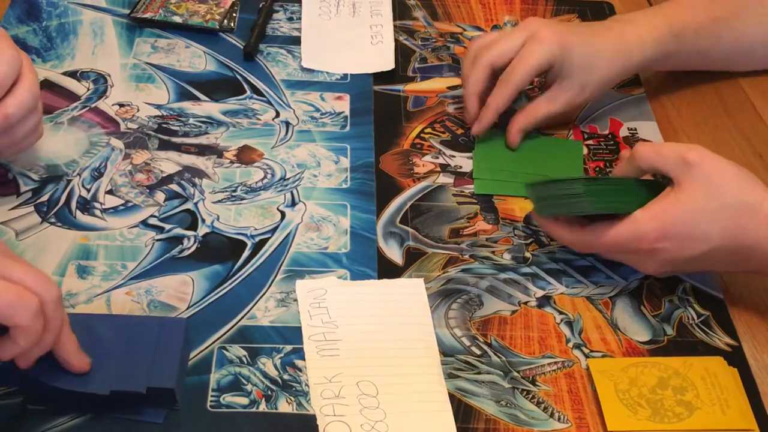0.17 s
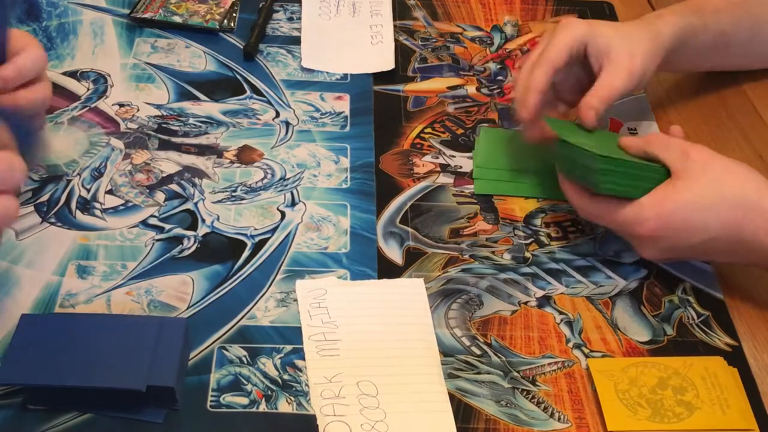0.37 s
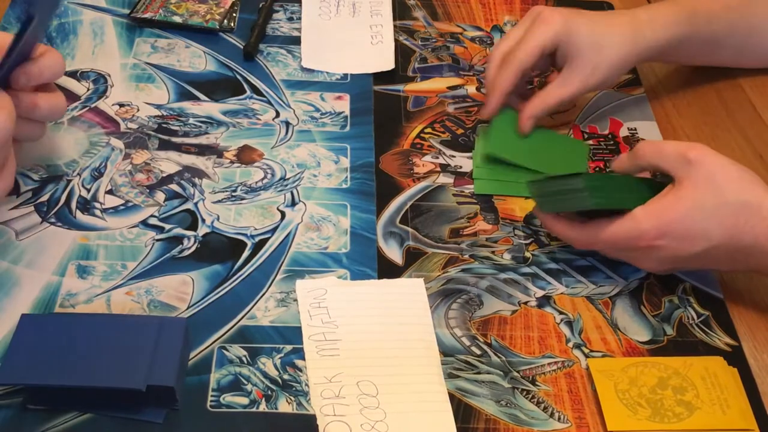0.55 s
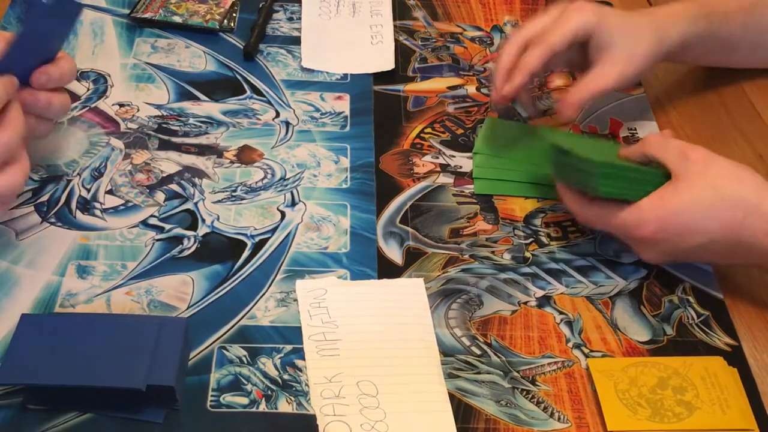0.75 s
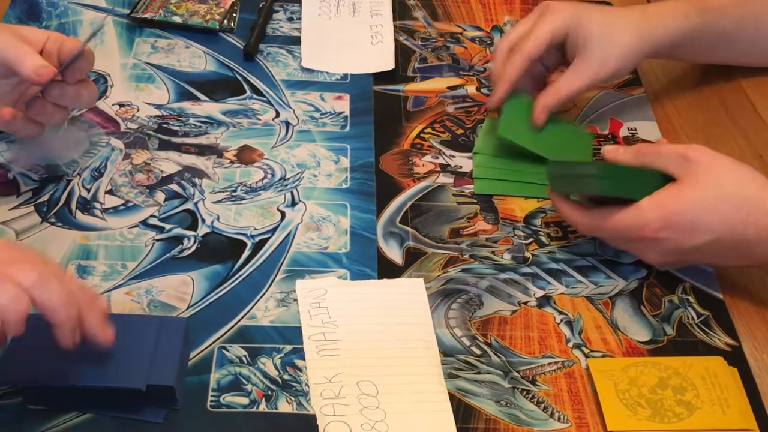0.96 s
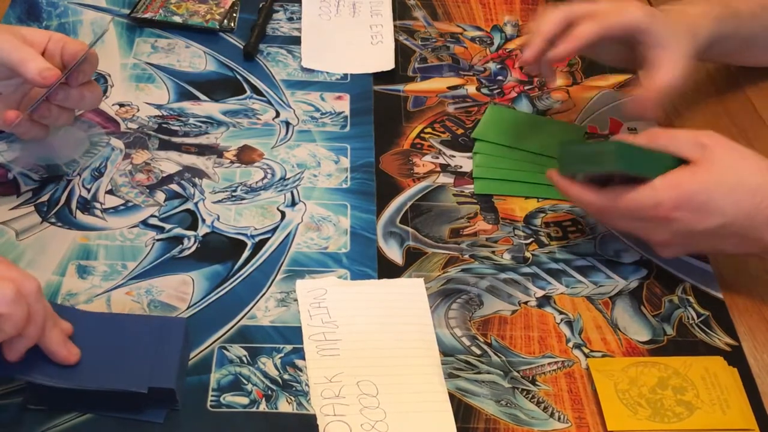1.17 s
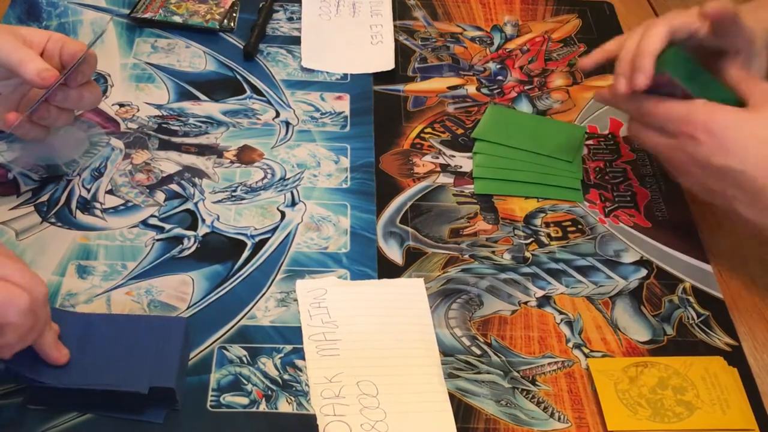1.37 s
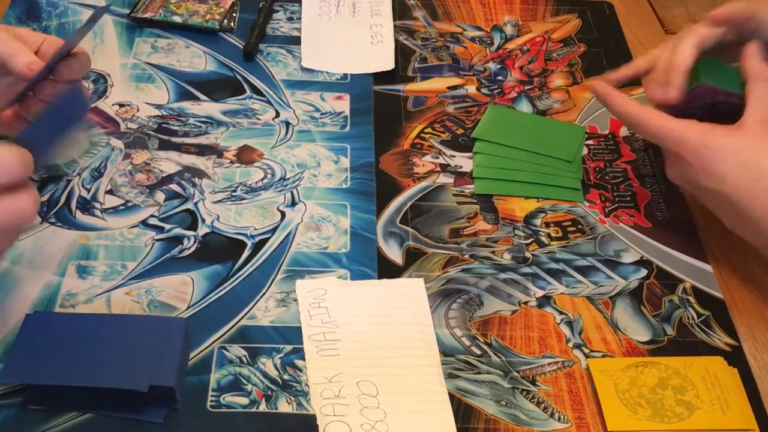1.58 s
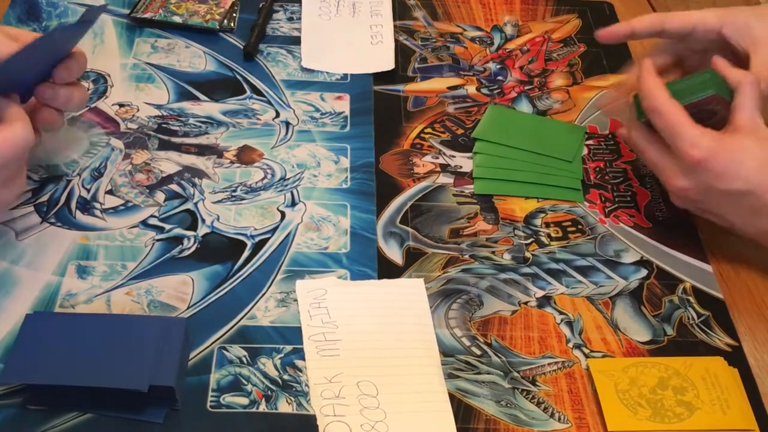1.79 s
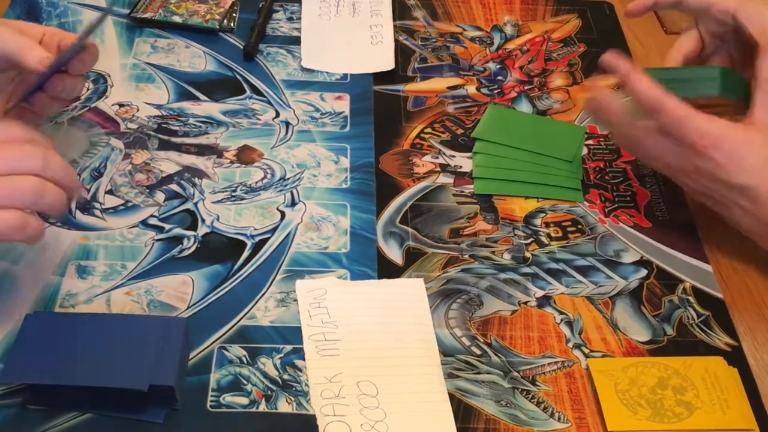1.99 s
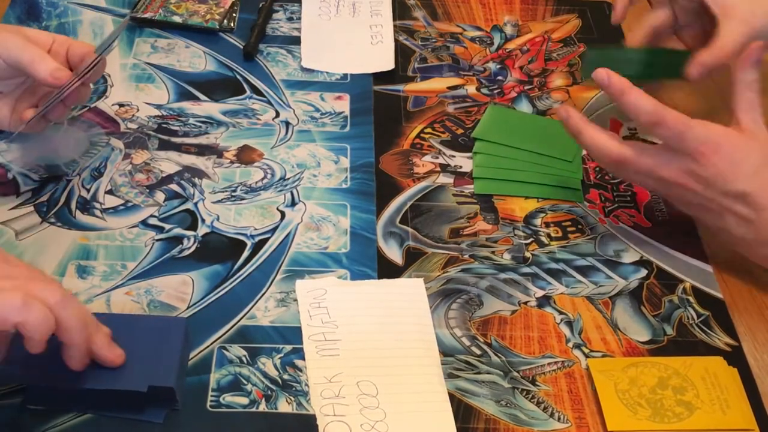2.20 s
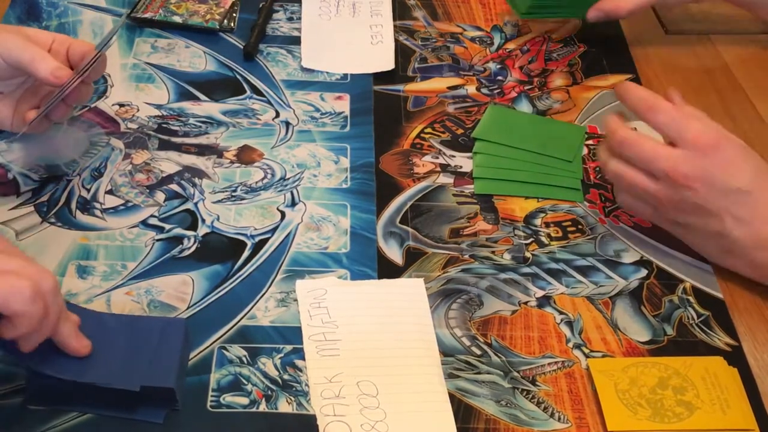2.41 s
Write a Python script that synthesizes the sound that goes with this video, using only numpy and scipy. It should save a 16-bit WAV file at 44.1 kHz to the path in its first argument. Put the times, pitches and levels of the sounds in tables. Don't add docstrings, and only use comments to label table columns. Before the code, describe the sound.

Close-up card handling in a hard-walled room: plastic sleeves hiss and flick free, cards tap the padded table with soft low thumps, busiest in the first second, then sparser and quieter over faint rumble and hum.

```python
import sys
import numpy as np
from scipy import signal
from scipy.fft import rfft, irfft, next_fast_len
from scipy.io import wavfile
from scipy.ndimage import map_coordinates

SR = 44100
rng = np.random.default_rng(int(sys.argv[2]) if len(sys.argv) > 2 else 0)


def waveform_to_disk(signal):
    frames = np.transpose(np.atleast_2d(signal))
    scaled = np.clip(frames, -1, 1) * 32767
    samples = np.round(scaled).astype(np.int16)
    wavfile.write(sys.argv[1], SR, samples)


def natural_amplitude(level_db):
    exponent = np.asarray(level_db, float) / 20
    return 10 ** exponent


N = 108045

# (frequency [Hz], density [dB per Hz])
SLEEVE = [(1500, -34), (3500, -5), (6000, -7), (9000, -3), (12500, 7.5), (16000, -4)]


def unit(x):
    return x / np.sqrt(np.mean(x ** 2) + 1e-20)


def along(points, hz):
    f, v = np.transpose(points)
    return np.interp(np.log(hz + 1), np.log(f + 1), v)


def filtered(x, response):
    m = next_fast_len(len(x) + 8192)
    hz = np.fft.rfftfreq(m, 1 / SR)
    return irfft(rfft(x, m) * response(hz), m)[:len(x)]


def noise(spectrum):
    closed = [(spectrum[0][0] / 2, -60)] + list(spectrum)
    return unit(filtered(rng.standard_normal(N), lambda hz: natural_amplitude(along(closed, hz))))


def wobble(rate):
    knots = rng.standard_normal(int(N * rate / SR) + 4)
    return map_coordinates(knots, [np.arange(N) * rate / SR])


def add(out, s, sound):
    part = out[max(round(s * SR), 0):][:len(sound)]
    part += sound[:len(part)]


def contacts(rows, colour_at):
    push_s, crack_s, crack_room_db = 0.0013, 0.0013, -1
    out, t = np.zeros(N), np.arange(SR // 50) / SR
    impulse = 1. * (t == t[64])
    for s, db, hz, crack_db, room_db in rows:
        push, crack = rng.standard_normal((2, len(t)))
        push[6] += 7
        card = colour_at(hz)
        sleeve = lambda f: natural_amplitude(along(SLEEVE, f) / 2)
        ring = filtered(push * np.exp(-t / push_s), card)
        crack = filtered(crack * t * np.exp(-t / crack_s * 2), sleeve)
        parts = ((db, ring, card, room_db),
                 (db + crack_db, crack, sleeve, room_db + crack_room_db))
        for peak_db, part, colour, share_db in parts:
            part = natural_amplitude(peak_db) * part / abs(part).max()
            click = filtered(impulse, colour)
            sent = natural_amplitude(share_db) * np.linalg.norm(part) / np.linalg.norm(click)
            add(out, s, part)
            add(out, s, sent * signal.fftconvolve(click, tail()))
    return out


def snaps():
    # (time [s], peak [dB], card ring [Hz], sleeve crack [dB re ring], room share [dB])
    flicks = [
        (.2411, -14.5, 2710, -12.5, 0),
        (.6572, -28.5, 2820, -4, 0.5),
        (1.049, -43, 2450, 0, -1.5),
        (1.412, -47.5, 5340, -12, -2),
        (1.4886, -55.5, 3100, 21, -0.5),
        (1.648, -53.5, 5770, 4, -9),
        (1.656, -45.5, 6140, 10, -4),
        (2.054, -60, 2050, 5, 0),
    ]
    q = 2.2

    def card_ring(hz):
        return lambda f: (1j * f * hz / q / (hz * hz - f * f + 1j * f * hz / q)) ** 2
    return contacts(flicks, card_ring)


def taps():
    # (time [s], peak [dB], dull above [Hz], sleeve crack [dB re tap], room share [dB])
    touches = [(.091, -50, 2500, 1.5, 7.5), (.1803, -33.5, 1310, -10.5, 5), (.195, -40, 1490, -2.5, -3.5),
               (.229, -31.5, 2000, -9, 8.5), (.2385, -45.5, 4000, 6.5, 4), (.498, -57, 2500, 2, 7.5),
               (.5977, -27.5, 1230, -13.5, 1), (.610, -45, 2500, -11, -4.5), (.905, -46.5, 1090, -8, -6),
               (.94, -45.5, 1980, -9.5, 6.5), (1.0382, -34.5, 3470, -3.5, 2), (1.0808, -25, 1500, -4, -1.5),
               (1.577, -48, 4000, 9.5, -6), (1.803, -43, 1200, -5.5, 0.5), (2.272, -51.5, 900, -8.5, 3.5),
               (2.387, -50.5, 2200, -17, 14)]
    low_hz = 250

    def soft_contact(hz):
        return lambda f: 1j * f / (low_hz + 1j * f) / (1 + 1j * f / hz) ** 1.02
    return contacts(touches, soft_contact)


def slides():
    # (end [s], length [s], sleeve hiss [dB], card rustle [dB])
    scrapes = [(.03, 0.15, -68.5, -63), (0.182, 0.18, -67, -60.5), (0.245, 0.033, -47.5, -55),
               (0.392, 0.046, -47, -53.5), (0.43, 0.018, -75, -58.5), (0.519, 0.046, -62.5, -59),
               (0.566, 0.05, -58, -55), (0.597, 0.032, -65, -53.5), (0.65, 0.062, -66.5, -53),
               (0.6562, 0.0048, -43.5, -35.5), (0.747, 0.029, -53.5, -57.5), (0.865, 0.065, -79, -61.5),
               (0.971, 0.049, -64, -54.5), (1.026, 0.018, -68, -56.5), (1.078, 0.0048, -39.5, -66),
               (1.346, 0.12, -67.5, -93), (1.415, 0.046, -65, -63), (1.503, .02, -58, -79),
               (1.563, 0.04, -53.5, -55.5), (1.573, 0.017, -42.5, -55), (1.58, 0.023, -50, -54.5),
               (1.66, 0.022, -65, -57), (1.692, 0.015, -66, -63), (1.941, 0.13, -70.5, -74.5),
               (2.065, 0.023, -74.5, -64), (2.285, 0.026, -89, -62), (2.45, 0.15, -70, -68.5)]
    # (frequency [Hz], density [dB per Hz])
    rustle = [(300, -19), (800, -21), (2000, -10.5), (3000, -10.5), (4500, -15), (7000, -21)]
    rise_power, stop_s, grain_db, grains_per_s = 1.67, 0.003, 2, 420
    t = np.arange(N) / SR
    power = np.zeros((2, N))
    for end, length, hiss_db, rustle_db in scrapes:
        swell = np.clip(1 - (end - t) / length, 0, 1)
        stop = np.exp(-np.clip(t - end, 0, None) / stop_s)
        shape = np.sin(swell * np.pi / 2) ** rise_power * stop
        power += natural_amplitude([[hiss_db], [rustle_db]]) ** 2 * shape ** 2
    grain = unit(natural_amplitude(grain_db * wobble(grains_per_s)))
    return grain * (np.sqrt(power[0]) * noise(SLEEVE) + np.sqrt(power[1]) * noise(rustle))


def thumps():
    # (time [s], peak [dB], table mode [Hz])
    pushes = [(.18, -52, 119), (.243, -43, 179.4), (0.602, -49.5, 185), (.72, -42, 136.4),
              (1.083, -40.5, 184), (1.09, -37.5, 106.8), (1.585, -45.5, 106), (1.586, -54.5, 279),
              (0.249, -54, 334.4), (2.392, -60.5, 289), (1.803, -45.5, 100), (2.28, -50.5, 167)]
    t60_s, onset_s = 0.092, 0.0032
    out, t = np.zeros(N), np.arange(SR // 3) / SR
    for s, db, hz in pushes:
        boom = np.sin(2 * np.pi * hz * t) * (1 - np.exp(-t / onset_s))
        add(out, s, natural_amplitude(db - 60 * t / t60_s) * boom)
    return out


def tail():
    # (frequency [Hz], t60 [s])
    wall_t60 = [(150, 0.76), (400, 0.44), (1000, 0.4), (2800, 0.31), (7000, 0.43), (14000, .26)]
    # (frequency [Hz], level [dB])
    wall_colour = [(150, 2), (600, 5), (1500, 7), (3000, 0.5), (7000, 1), (14000, -2.5)]
    delay_s, fill_s, room_db, near_share = 0.0042, 0.002, -2, 0.34
    hz, t, z = signal.stft(rng.standard_normal(SR // 2), SR, nperseg=256)
    decay_db = along(wall_colour, hz)[:, None] - 60 * t / along(wall_t60, hz)[:, None]
    x = signal.istft(z * natural_amplitude(decay_db), SR, nperseg=256)[1]
    late = np.clip(np.arange(len(x)) / SR - delay_s, 0, None)
    x = x * (near_share + 1 - np.exp(-late / fill_s))
    return natural_amplitude(room_db) * x / np.linalg.norm(x)


def air():
    # (frequency [Hz], density [dB per Hz])
    hiss = [(250, -3), (350, -6.5), (800, -9.5), (1700, -14.5), (3500, -17.5), (8000, -23.5), (16000, -13)]
    # (frequency [Hz], density [dB per Hz])
    rumble = [(20, -49), (40, -1), (70, -9), (135, -5), (200, -17.5), (320, -21.5)]
    hum_hz, hum_wander_hz, hum_sway_db = 100, 3.55, 3
    hiss_db, rumble_db, hum_db = -67.5, -63.5, -63.5
    turns = np.cumsum(hum_hz + hum_wander_hz * wobble(14)) / SR
    hum = natural_amplitude(hum_sway_db * wobble(17)) * np.sin(2 * np.pi * turns)
    breath = natural_amplitude(hiss_db + 1.1 * wobble(7.4)) * noise(hiss)
    low = natural_amplitude(rumble_db) * noise(list(rumble) + [(600, -52)])
    return breath + low + natural_amplitude(hum_db) * unit(hum)


def scene():
    rub, boom = slides(), thumps()
    rub_walls = natural_amplitude(-3.5) * signal.fftconvolve(rub, tail())[:N]
    boom_walls = natural_amplitude(-5) * signal.fftconvolve(boom, tail())[:N]
    return (snaps() + taps() + rub + boom + rub_walls + boom_walls + air())[None]


def roll_off(x):
    return signal.sosfilt(signal.butter(12, 16850, fs=SR, output="sos"), x)


def record(dry):
    # (frequency [Hz], level [dB])
    mic = [(4000, 1), (4800, -1), (6000, 3.5), (7600, 0), (9000, 4), (10400, -1), (12000, 2), (15500, 1.5)]
    top_hz, top_leak_db, end_hz = 15900, -40, 16800

    def response(hz):
        return natural_amplitude(along(mic, hz) + top_leak_db * (hz > top_hz)) * (hz < end_hz)
    return roll_off(filtered(dry[0], response)[None])


dry = scene()
out = record(dry)
waveform_to_disk(out)
```